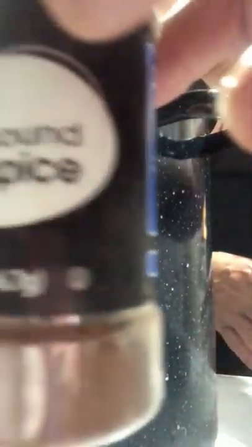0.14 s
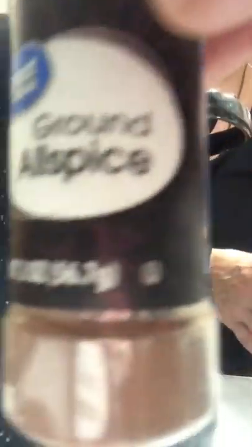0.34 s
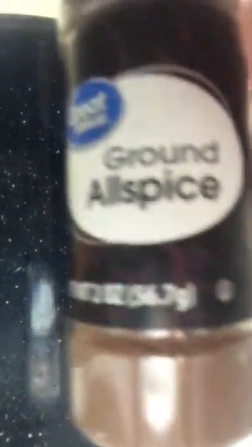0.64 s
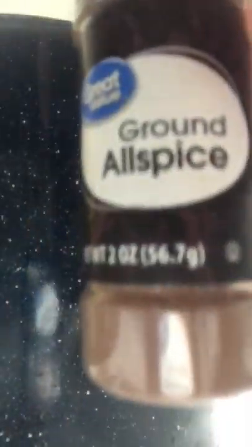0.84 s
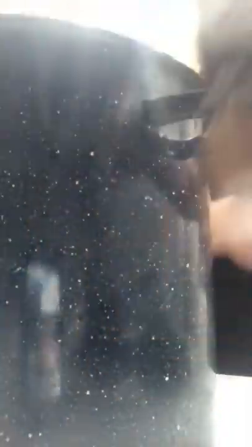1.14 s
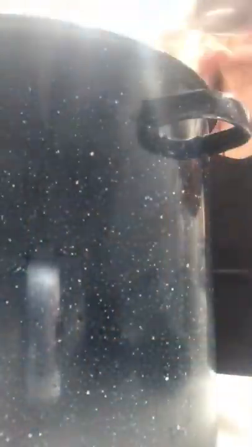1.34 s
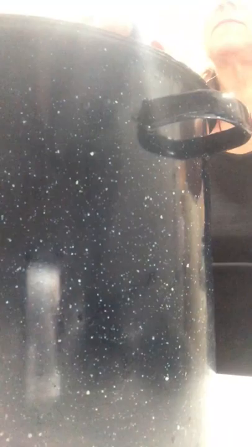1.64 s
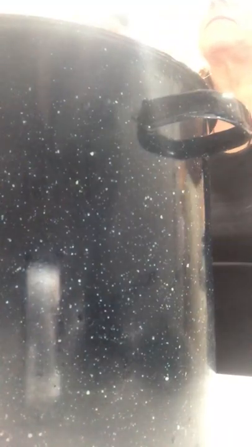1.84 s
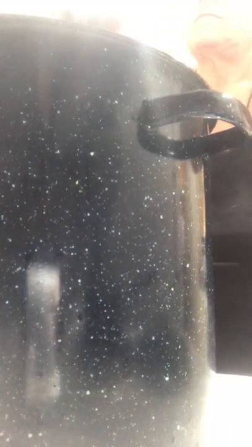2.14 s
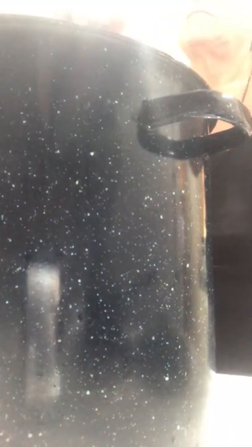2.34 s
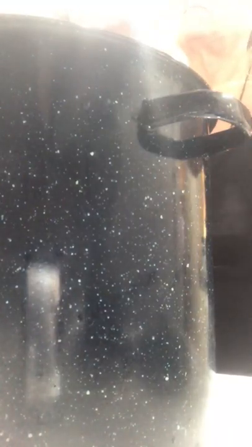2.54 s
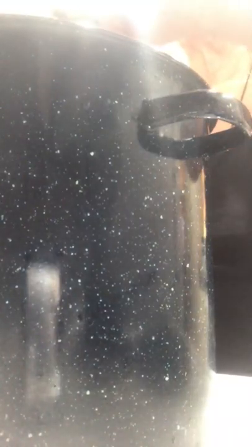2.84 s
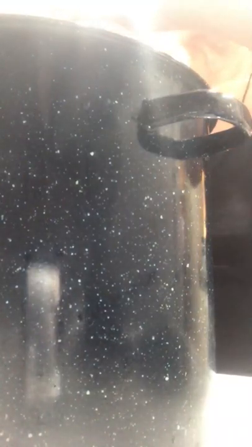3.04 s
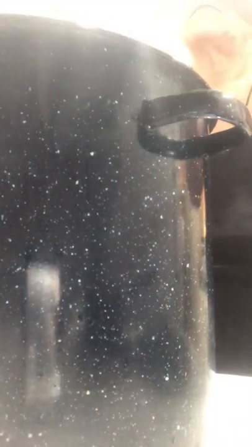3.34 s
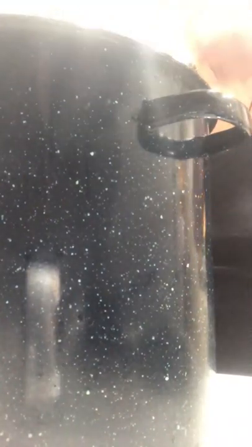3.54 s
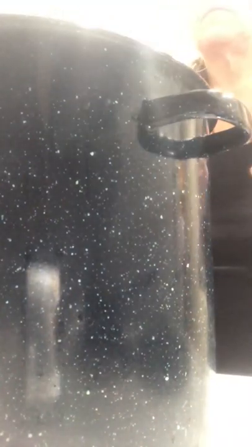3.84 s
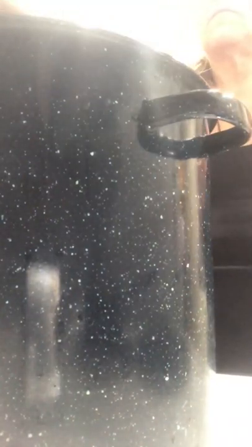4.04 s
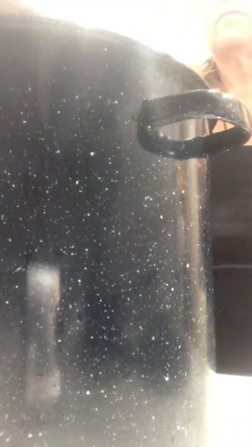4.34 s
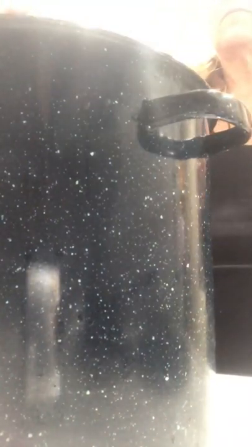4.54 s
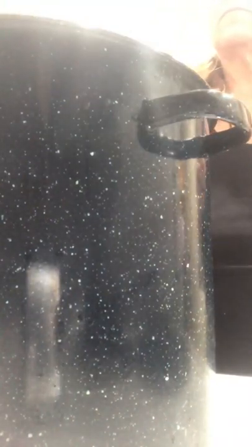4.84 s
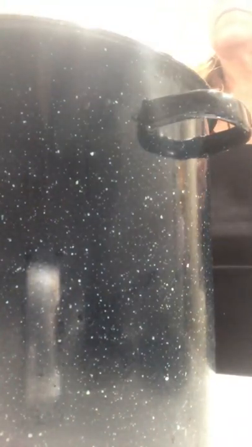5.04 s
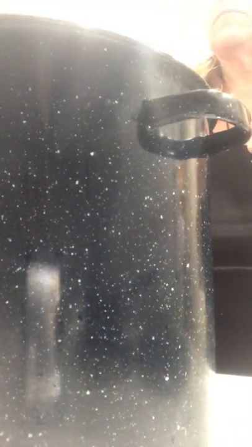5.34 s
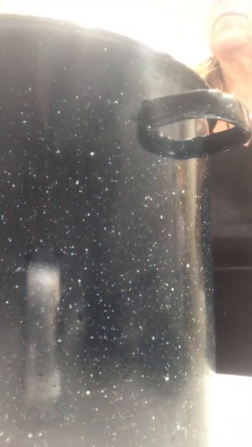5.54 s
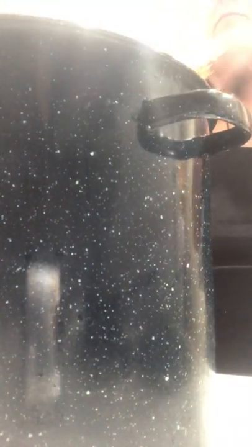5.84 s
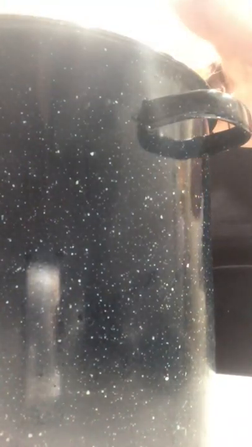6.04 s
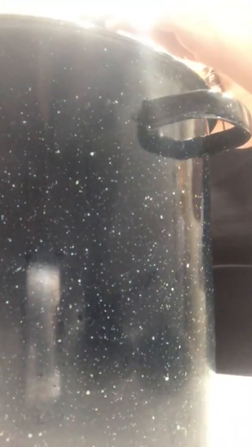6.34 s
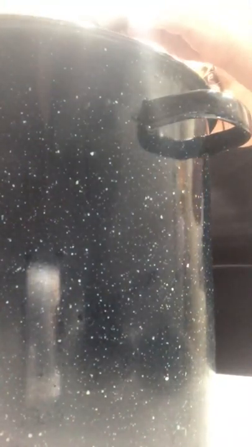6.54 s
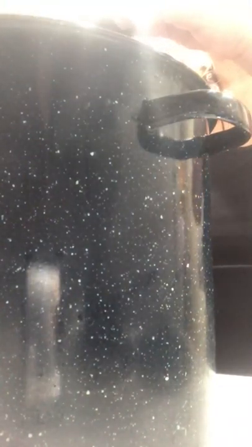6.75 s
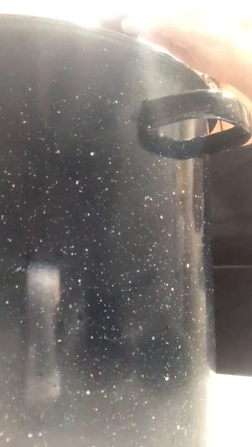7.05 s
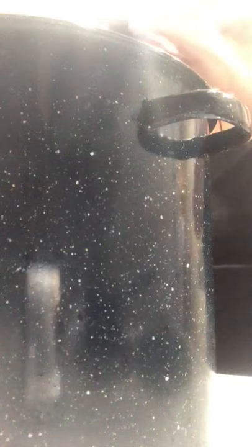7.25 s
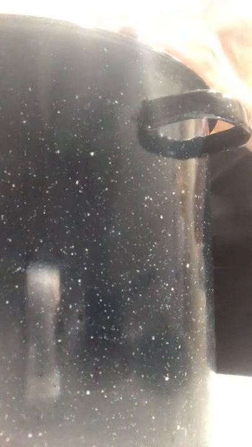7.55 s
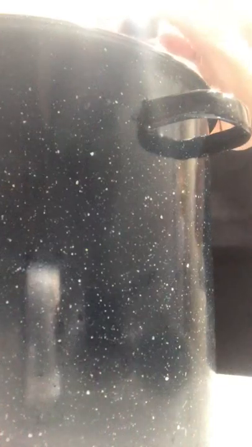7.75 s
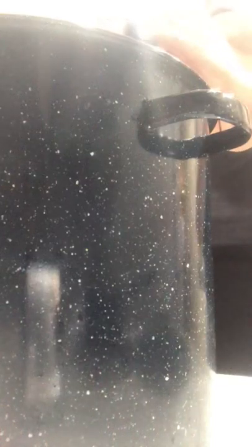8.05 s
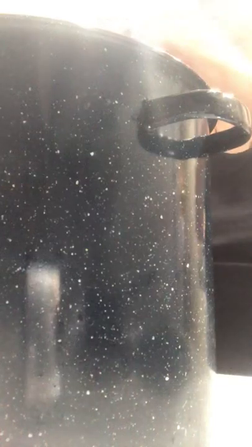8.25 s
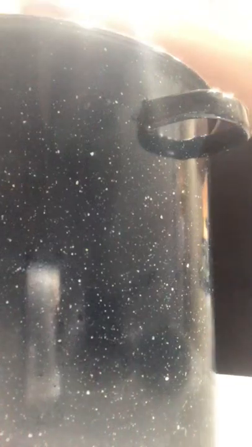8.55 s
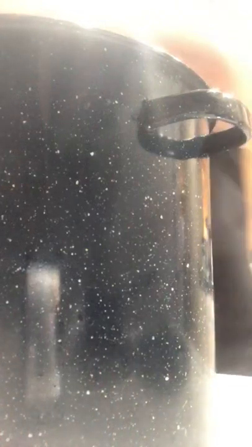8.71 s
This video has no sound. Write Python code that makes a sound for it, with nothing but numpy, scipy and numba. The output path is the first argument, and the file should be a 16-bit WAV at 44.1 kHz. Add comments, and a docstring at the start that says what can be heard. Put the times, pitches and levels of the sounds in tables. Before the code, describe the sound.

Steady low kitchen hum and soft fan air, faint metal ticking that thins out, and sharp close plastic clicks with brief finger rustles.

```python
"""A quiet kitchen, with a phone as the microphone and a plastic spice jar handled close to it.
Behind, a fridge compressor hums as wavering sine tones and a fan blows as slowly breathing noise.
Across the room something metallic ticks, fast at first and ever slower: noise bursts ring metal modes.
Near the phone the jar is snapped open and tapped (bursts through plastic modes) and rubbed
(gritty noise through a moving resonance). Noise tails give the echoes of counter and room."""
import sys
import numpy as np
from scipy import signal
from scipy.fft import rfft, irfft
from scipy.io import wavfile
from scipy.ndimage import uniform_filter1d
from numba import njit

SR = 44100
rng = np.random.default_rng(int(sys.argv[2]) if len(sys.argv) > 2 else 0)


def output_pcm(signal):
    """Save a mono or channel-first signal as 16-bit PCM at the path in sys.argv[1].

    Samples are clipped to [-1, 1] before scaling.
    """
    pcm = np.clip(np.atleast_2d(signal).T, -1, 1) * 32767
    wavfile.write(sys.argv[1], SR, np.round(pcm).astype(np.int16))


N = 391608  # samples

# Steady tones of compressor and fan. Each row: pitch in Hz, level in dB rms, waver in dB.
HUM_TONES = [(58.0, -50.7, .3), (215.6, -60, 1.5), (239.9, -40.1, .5), (283.2, -54.3, 1.2), (522, -67, 1.5),
             (116.2, -61, 2.5), (120.1, -60, 2.5), (464, -66, 2.5), (812.6, -73, 1.5), (986.7, -75, 1.5)]
# Colour of the fan's air noise. Each row: frequency in Hz, relative density in dB per Hz.
AIR_COLOUR = [(25, -45), (40, -16), (75, -12.5), (118, -1), (200, -3.5), (350, -3.5), (480, -7),
              (700, -14.5), (1100, -22.5), (1450, -20), (1750, -22), (2100, -29), (2900, -29.5),
              (3800, -28), (4600, -30.5), (5100, -38.5), (6500, -37), (9000, -44.5), (16000, -46.5)]
AIR_DB = -48.5  # rms level of the fan's air noise
# How long the kitchen echoes. Each row: frequency in Hz, time to fall 60 dB in seconds.
ROOM_DECAY = [(300, 0.46), (1500, 0.25), (4000, 0.22), (10000, 0.18)]

# Ticks across the room. Each row: start in seconds, peak level in dB, thud shift in dB,
# body shift in dB, treble shift in dB, rattle in ms.
TICKS = [(0.0074, -51.5, -6, -4, -10, 14), (0.078, -43, 5, 8, -10, 10.4), (0.158, -44.5, 0, 3, -9, 13),
         (0.2345, -40, -8, 7, 2.5, 23), (0.2673, -46.5, 1, 0, -3, 27), (0.3565, -45.5, -5, 4.5, -7, 11),
         (0.437, -48, 4, 3, -5, 24), (0.5239, -41, -5, 6, 2, 15), (0.5555, -46.5, 5, 6, -6, 20),
         (0.601, -42.5, -5, 7.5, -7, 11), (0.649, -50.5, 7, 6, -9, 16), (0.7105, -46, 2, 2.5, -4, 24),
         (0.819, -40.5, -16, 8, 3, 13.5), (0.874, -44, 6.5, -4, -1, 19), (0.9712, -49.5, 1, 1, -5, 18),
         (1.038, -44, 5, 0, -7, 16), (1.133, -46, 1, 3, -4, 14), (1.2347, -46.5, 7, -4, -3, 15),
         (1.3236, -53, 8, 11, -3, 13), (1.3756, -46, 2, -1.5, -4, 17), (1.487, -38.5, -10, 2, 5, 15),
         (1.6042, -40.5, 3, -4, -4, 10), (1.7384, -45.5, -7, -3, 0, 17), (1.8446, -45.5, 6, -9, -2, 13),
         (1.9761, -45, 5.5, -1.5, 0, 18), (2.0855, -44, -6, -8, 1.5, 18), (2.1848, -43.5, -1, 3, 3, 11),
         (2.2398, -50.5, -2, 9, -7, 22), (2.3134, -43, 1, -5, -1, 16), (2.458, -44.5, -4, -5, -2, 21),
         (2.5965, -43, -9, 3, 6, 19), (2.652, -51, -9, -12, 5, 16), (2.676, -44, -6, 4, 2, 20),
         (2.7142, -43, 4, -6, 1, 15), (2.8404, -43.5, -8, -4, -3, 17), (2.8646, -48, -3, 0, 0, 13),
         (3.2036, -43.5, 2, -3, 0, 19), (3.3495, -49.5, 5, -8, 4, 18), (3.3652, -46, -3, 2, 3, 15),
         (3.4328, -42.5, 2, -5, -1, 14), (3.5834, -44, 7, -7, -1, 14), (3.712, -43, 0, 0, 5, 14),
         (3.7867, -46.5, 1, 6, -1, 8), (3.8478, -43, 6, -9, -0.5, 13), (4.024, -49.5, -2, -2, 3, 18),
         (4.0701, -47, 7, 12, -1, 20), (4.1682, -40, 7.5, 0, 1, 15), (4.338, -43.5, -4, 0, 5.5, 11),
         (4.4108, -51, -8, 6, -2, 15), (4.4692, -51.5, 7, 2, -5, 15), (4.5364, -38.5, 2, -1, 2, 11),
         (4.7047, -44.5, -7, 1, 4, 14), (4.7726, -52.5, -3, 3, -1, 14), (4.8778, -40, 6, -6.5, 2.5, 15),
         (5.056, -50.5, 5, 1, -3, 14), (5.1053, -57, -2, 8, 4, 16), (5.1947, -40, 7, -4.5, 2.5, 12.6),
         (5.2876, -56, 3, -5, -1, 18), (5.3351, -48.5, 9, 0, 0, 21), (5.4525, -54, 14, 6, 2, 18),
         (5.5598, -39, 6, 1, 2.5, 14.4), (5.7633, -49.5, -5, 3, 1, 16), (5.9147, -38.5, 3, 0, 3.5, 13),
         (6.1168, -49, -4, 1, 0, 25), (6.443, -39, 6.5, -2, 3.5, 17.5), (7.5904, -52.5, -3, -5, 5, 13),
         (7.8527, -49, -6, 8, -3, 32), (8.6121, -43.5, 4, -2.5, 5, 21)]
# Ringing of the ticking metal. Each row: mode in Hz, level in dB, time to fall 60 dB in seconds.
METAL_MODES = [(397, 6.5, 0.024), (510, -3.5, 0.084), (637.5, 9, 0.081), (1365, 8.5, 0.066),
               (1431, 8.5, 0.093), (1954, 2.5, 0.022), (2810, 5, 0.063), (3158, 8.5, 0.074),
               (3550, 3.5, 0.012), (4050, -4, 0.0095), (4630, 1.5, 0.059), (5650, -7, 0.067),
               (6200, 3, 0.034), (7720, 9, 0.084)]

# Fingers rubbing the jar. Each row: loudest moment in seconds, rise in seconds, fall in seconds,
# level in dB, centre in Hz.
RUBS = [(.06, 0.23, .16, -58, 3350), (2.07, 0.086, .07, -58, 3970), (2.31, .16, .07, -62, 4860),
        (2.44, .1, .06, -67, 4890), (2.65, 0.049, 0.1, -56, 3840), (3.135, .006, 0.19, -50, 4260),
        (7.19, 0.097, 0.15, -51, 4950), (7.27, .04, 0.16, -57, 3720), (7.87, 0.019, .16, -57.5, 3500),
        (8.19, .03, .12, -57, 4200), (8.255, .07, 0.1, -53.5, 4370), (8.82, 0.069, .2, -62.5, 4000)]
RUB_EDGE_DB, RUB_ROUND = -19, 1.16  # level at the ends of a rub against its top, roundness of its top
RUB_SAG_HZ_PER_S = 2300  # the pitch sinks as the finger slows

# Snaps and taps of the jar. Each row: start in seconds, peak level in dB, thud shift in dB,
# body shift in dB, treble shift in dB, rattle in ms, favoured ring in Hz.
SNAPS = [(1.758, -40, 3, -5, 5, 8.3, 2380), (2.9963, -44.5, -3, 8, -2, 18, 3480),
         (3.0224, -26.5, 10.5, 2, -2, 3.6, 2460), (3.1085, -38, -10, -4, 1, 5.6, 3000),
         (3.1175, -19.5, -10, -7.5, 5, 3.54, 4090), (3.142, -39, 17.5, -2, 4, 1.5, 2600),
         (5.5343, -37.5, 2, 1, 4, 10, 2160), (6.1632, -44.5, 13, 4, -4, 13, 2050),
         (6.2718, -21, -4.5, -7.5, -9.5, 2.5, 1800), (6.3234, -35.5, -5, 2, -10, 3.4, 1870),
         (6.3876, -42.5, 7, -8, -3, 2.7, 3900), (6.605, -28, 2, -7, 0.5, 2.2, 1700),
         (6.781, -32, -5, 1, 2, 3.5, 2300), (7.062, -49.5, 0, -2, -8, 3.5, 3700),
         (7.235, -27, -8, 4.5, -12, 3.4, 3500), (8.0558, -51, 3, 8, 0, 3.5, 3600),
         (8.268, -35, -20, -3, 4.5, 4, 3680), (8.428, -48, -5, -2, 9, 15, 3620)]
# Ringing of the plastic jar. Each row: mode in Hz, level in dB, time to fall 60 dB in seconds.
JAR_MODES = [(340, 5, .05), (430, 8, .05), (510, 6, .06), (1060, -4, .02), (1800, -1, .022),
             (2390, -2, .022), (3400, -2, .018), (4060, -1, .022), (4650, -3, .015), (6690, -4, .012),
             (7800, -4, .012), (10700, -5, .01)]
GRIP_DB = 8.5  # level of the ring that the grip favours

# Colour points of a blow. One column: frequency in Hz (thud, hollow, ring, knock, edge, click, air, top).
COLOUR_HZ = [450, 850, 1400, 2400, 3900, 7000, 13000, 17000]
# Basic colour of a tick and of a snap. One column: level in dB at each colour point.
TICK_COLOUR_DB = [-4, -8, -8, -12, -13, -22, -34, -36]
SNAP_COLOUR_DB = [-10, -17, -10, -12.5, -11.5, -27, -32, -37]
# What each colour point takes of a blow's thud, body and treble shift. One column: share [dB per dB].
THUD_SHARE = [1, 0.34, 0.035, 0, 0.032, 0, 0.24, 0.19]
BODY_SHARE = [-0.018, 0.76, 0.94, -0.25, 0, 0.18, -0.092, 0]
TREBLE_SHARE = [0, 0.069, 0.04, .1, 0.055, 0.81, 1.1, 1.1]

TOP_HZ = 17100  # highest pitch that the phone passes


def undb(db):
    """Gain of a level in dB."""
    return 10 ** (np.asarray(db) / 20)


def walk(rate):
    """Random levels drawn at `rate` per second and slewed twice; spread near 0.5."""
    hold = int(SR / rate)
    steps = np.repeat(rng.standard_normal(N // hold + 1), hold)
    return 0.63 * uniform_filter1d(uniform_filter1d(steps, hold), hold)[:N]


def on_log(hz, points_hz, values):
    """Straight lines between points on a log-frequency axis."""
    return np.interp(np.log(hz + 1), np.log(points_hz), values)


def hum():
    """Compressor and fan tones: sines whose level and phase waver a little."""
    t = np.arange(N) / SR
    total = np.zeros(N)
    for pitch_hz, db, waver_db in HUM_TONES:
        gain = np.sqrt(2) * undb(db + waver_db * walk(7.3))
        cycles = pitch_hz * t + rng.random()
        total += gain * np.sin(2 * np.pi * cycles + 0.12 * waver_db * walk(5.5))
    return total


def fan():
    """Broad air noise; lows and highs breathe slowly on their own."""
    hz = np.arange(N // 2 + 1) * SR / N
    noise = rfft(rng.standard_normal(N)) * undb(on_log(hz, *np.transpose(AIR_COLOUR)))
    high_share = hz / (hz + 1500)
    lows = irfft(noise * (1 - high_share), N) * undb(0.5 * walk(2.17))
    highs = irfft(noise * high_share, N) * undb(0.33 * walk(1.87))
    air = lows + highs
    return air * undb(AIR_DB) / air.std()


def kitchen(x, first_s=0.0083, size=22050):
    """Diffuse echoes: octave bands of noise, the treble dying first, swelling in over first_s."""
    t = np.arange(size) / SR
    hz = np.arange(size // 2 + 1) * SR / size
    noise = rfft(rng.standard_normal(size))
    tail = np.zeros(size)
    for centre_hz in 125 * 2. ** np.arange(8):
        octaves_off = np.log2((hz + 1) / centre_hz)
        band = np.cos(np.pi / 2 * np.clip(octaves_off, -1, 1)) ** 2
        t60 = on_log(centre_hz, *np.transpose(ROOM_DECAY))
        tail += irfft(noise * band, size) * undb(-60 * t / t60)
    tail *= 1 - np.exp(-(t / first_s) ** 2)
    return signal.fftconvolve(x, tail / np.sqrt(np.sum(tail ** 2)))[:N]


def counter(x, t60=0.035, size=4096):
    """Dense first echoes off worktop, pot and tiles, even in colour."""
    i = np.arange(size)
    spectrum = rfft(rng.standard_normal(size) * undb(-60 * i / SR / t60) * (i > 60))
    evened = spectrum / np.sqrt(uniform_filter1d(np.abs(spectrum) ** 2, size=16))
    tail = irfft(evened)[:size // 2]
    return signal.fftconvolve(x, tail / np.sqrt(np.sum(tail ** 2)))[:N]


def colour(base_db, thud_db, body_db, treble_db):
    """Where and how hard a thing is struck shifts its thud, body and treble."""
    shares = np.array([THUD_SHARE, BODY_SHARE, TREBLE_SHARE])
    return base_db + np.array([thud_db, body_db, treble_db]) @ shares


def ring(hz, modes):
    """Causal frequency response of a set of damped modes, each dB read at its peak."""
    out = 0
    for mode_hz, db, t60 in modes:
        width = np.log(1000) / (np.pi * t60)  # Hz
        out = out + undb(db) * 1j * hz * width / (mode_hz ** 2 - hz ** 2 + 1j * hz * width)
    return out


def blows(events, modes, rise_s, crack_db, hold, size=8192):
    """Each blow is a rattly push that rings the modes unevenly, with a broad crack on top."""
    out = np.zeros(N + size)
    t = np.arange(size) / SR
    hz = np.arange(size // 2 + 1) * SR / size
    for start_s, peak_db, colour_db, rattle_ms, extra_modes in events:
        # pitch and level of each mode stray from blow to blow
        struck = [(mode_hz * (1 + 0.015 * rng.standard_normal()), db + 2.5 * rng.standard_normal(), t60)
                  for mode_hz, db, t60 in modes]
        # hold over 1: the rattle lasts, then stops
        fade = np.exp(-(t * 1000 / max(rattle_ms, 0.5)) ** hold)
        push = rfft(rng.standard_normal(size) * (1 - np.exp(-t / rise_s)) * fade)
        push /= np.sqrt(uniform_filter1d(np.abs(push) ** 2, size=56))  # every band gets its share
        tone = undb(on_log(hz, COLOUR_HZ, colour_db)) * hz / (hz + 250)  # lows thinned
        sound = irfft(push * (ring(hz, struck + extra_modes) + undb(crack_db)) * tone)
        sound[-size // 8:] = 0  # drop what wraps round
        # the peak level is set between 1 and 9 kHz, over 2 ms
        heard = irfft(rfft(sound) * (hz > 1000) * (hz < 9000))
        peak = np.sqrt(2 * uniform_filter1d(heard ** 2, size=88).max())
        i = int(start_s * SR)
        out[i:i + size] += sound * undb(peak_db) / peak
    return out[:N]


def ticks():
    """Something metallic ticks across the room: short rattles ring its metal modes."""
    events = []
    for start_s, peak_db, thud_db, body_db, treble_db, rattle_ms in TICKS:
        colour_db = colour(TICK_COLOUR_DB, thud_db, body_db, treble_db)
        events.append((start_s, peak_db, colour_db, rattle_ms, []))
    return blows(events, METAL_MODES, rise_s=0.00091, crack_db=-3.0, hold=1.17)


@njit
def moving_band(x, hz, q):
    """State-variable band-pass with a moving centre."""
    y, band, low = np.empty(len(x)), 0., 0.
    for i in range(len(x)):
        g = np.tan(np.pi * hz[i] / SR)
        v = (band + g * (x[i] - low)) / (1 + g * (g + 1 / q))
        band, low, y[i] = 2 * v - band, low + 2 * g * v, v / q
    return y


def rubs(grit_db=3.5, q=2.9, broad_db=-4.5):
    """Skin on plastic: gritty noise through a moving resonance, with a broad skirt below it."""
    t = np.arange(N) / SR
    gain, hz = np.zeros(N), np.full(N, 4000.)
    for loudest_s, rise_s, fall_s, db, centre_hz in RUBS:
        start_s, end_s = loudest_s - rise_s, loudest_s + fall_s
        off_peak = np.interp(t, [start_s, loudest_s, end_s], [1, 0, 1])
        swell = undb(db + RUB_EDGE_DB * off_peak ** RUB_ROUND) * (t > start_s) * (t < end_s)
        sagging_hz = centre_hz - RUB_SAG_HZ_PER_S * np.maximum(t - loudest_s, 0)
        hz = np.where(swell > gain, np.clip(sagging_hz, 500, 12000), hz)  # the louder rub sets the pitch
        gain = np.maximum(gain, swell)
    grit = rng.standard_normal(N) * undb(grit_db * walk(440))
    resonance = moving_band(moving_band(moving_band(grit, hz, q), hz, q), hz, 2.6)
    skirt_hz = 0.56 * hz
    skirt = moving_band(moving_band(grit, skirt_hz, 1.3), skirt_hz, 1.3)
    scrape = resonance + undb(broad_db) * skirt
    return uniform_filter1d(gain, size=441) * scrape / scrape.std()


def snaps():
    """The jar snaps and taps: pushes ring its plastic modes, and the grip on it favours one ring."""
    events = []
    for start_s, peak_db, thud_db, body_db, treble_db, rattle_ms, grip_hz in SNAPS:
        colour_db = colour(SNAP_COLOUR_DB, thud_db, body_db, treble_db)
        grip_mode = (grip_hz, GRIP_DB, 0.012)
        events.append((start_s, peak_db, colour_db, rattle_ms, [grip_mode]))
    return blows(events, JAR_MODES, rise_s=0.00049, crack_db=-2.0, hold=1.23)


def scene():
    """Hum and fan behind, far ticks, and the jar in the hand, these two with their share of echoes."""
    far = ticks()
    jar = snaps() + rubs()
    room_echoes = kitchen(undb(-10) * far + undb(-9) * jar)
    counter_echoes = undb(-7.5) * counter(jar)
    return (hum() + fan() + far + jar + room_echoes + counter_echoes)[None]


def record(dry):
    """The phone's microphone cuts the top: a steep elliptic low-pass."""
    low_pass = signal.ellip(10, 0.2, 80, TOP_HZ, fs=SR, output="sos")
    return signal.sosfilt(low_pass, dry)


dry = scene()
out = record(dry)
output_pcm(out)
```